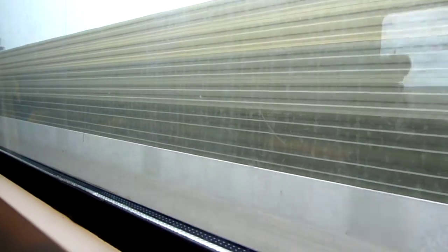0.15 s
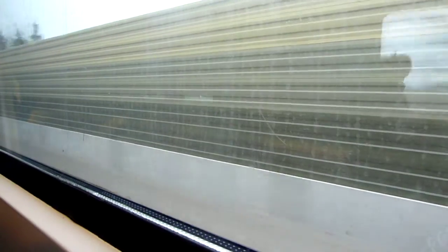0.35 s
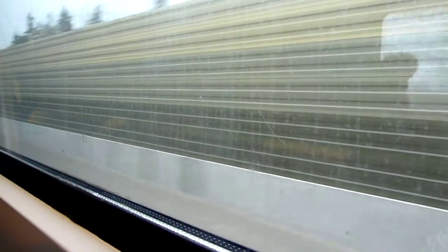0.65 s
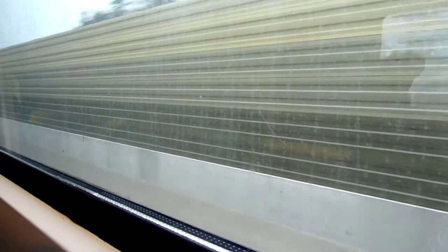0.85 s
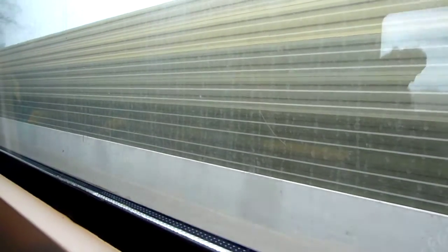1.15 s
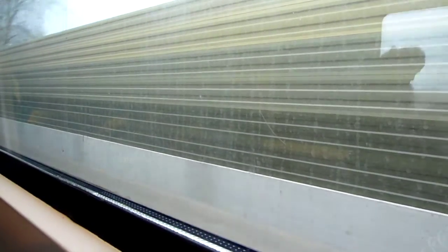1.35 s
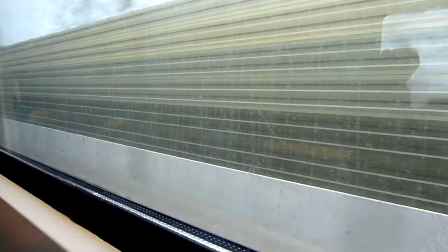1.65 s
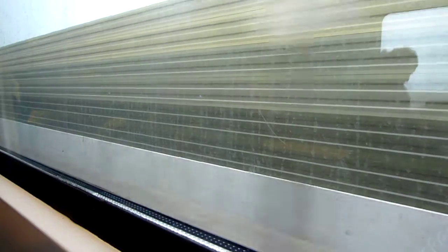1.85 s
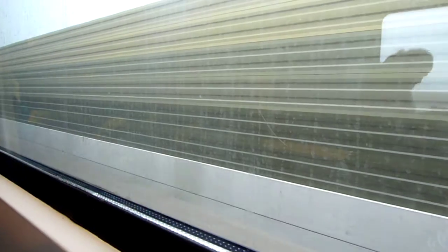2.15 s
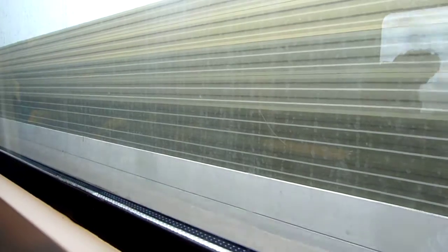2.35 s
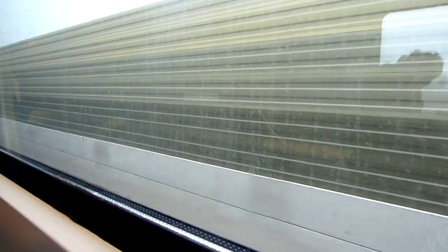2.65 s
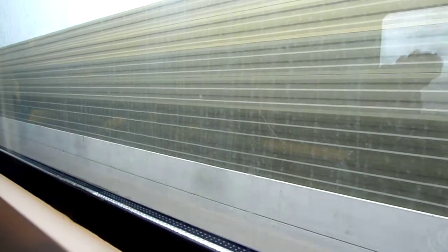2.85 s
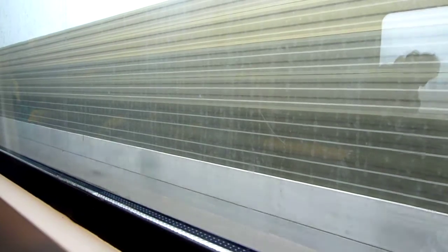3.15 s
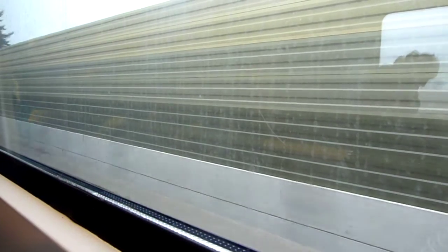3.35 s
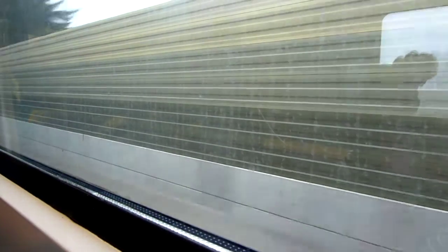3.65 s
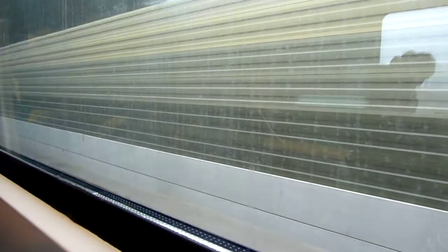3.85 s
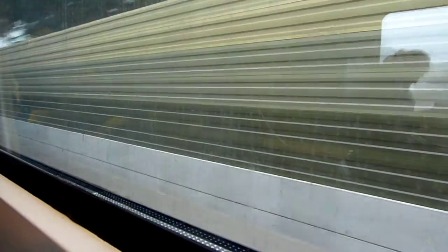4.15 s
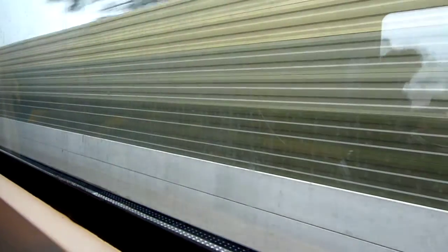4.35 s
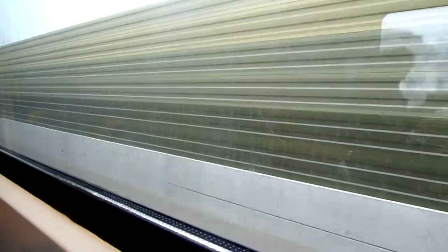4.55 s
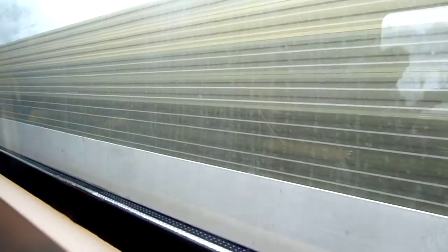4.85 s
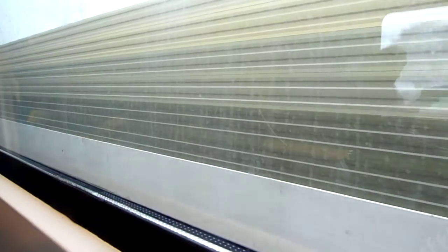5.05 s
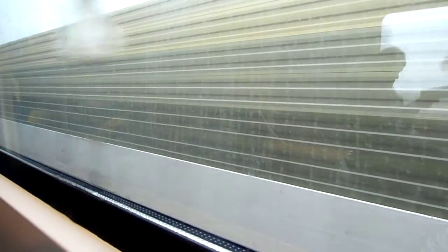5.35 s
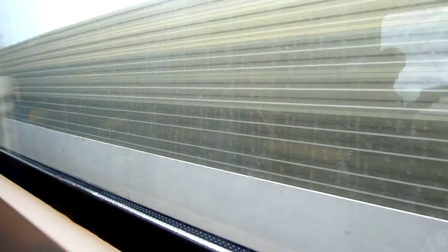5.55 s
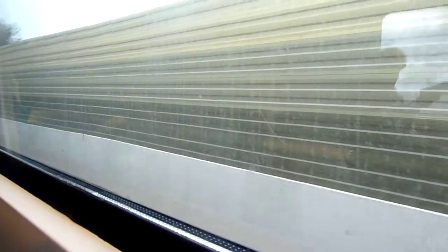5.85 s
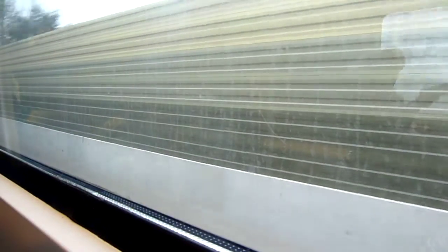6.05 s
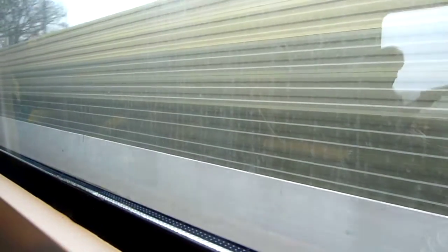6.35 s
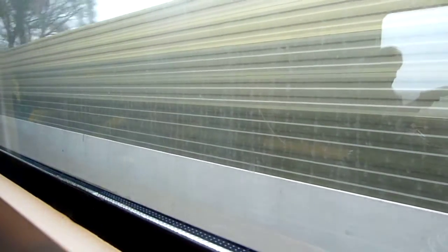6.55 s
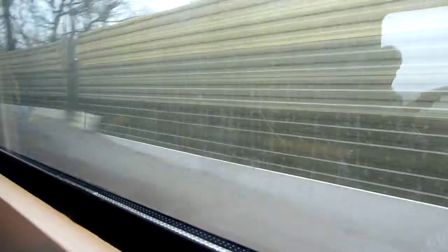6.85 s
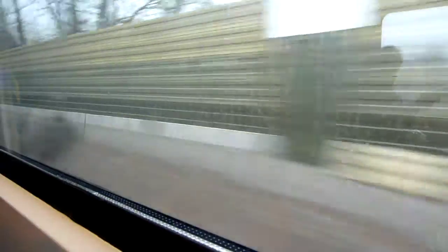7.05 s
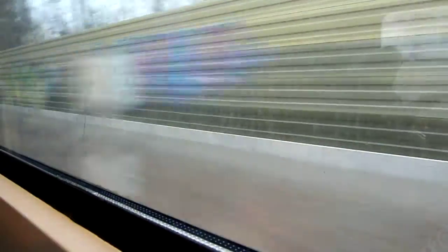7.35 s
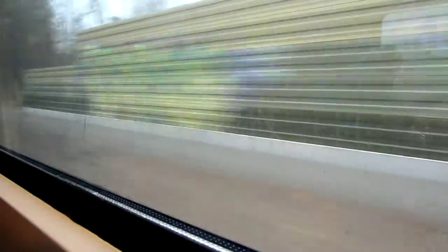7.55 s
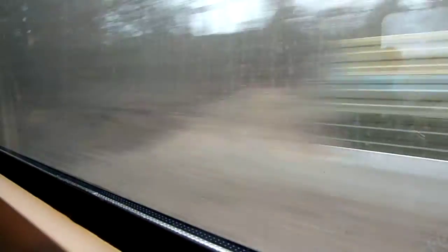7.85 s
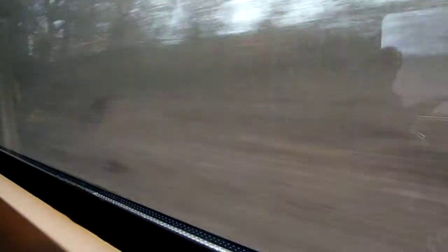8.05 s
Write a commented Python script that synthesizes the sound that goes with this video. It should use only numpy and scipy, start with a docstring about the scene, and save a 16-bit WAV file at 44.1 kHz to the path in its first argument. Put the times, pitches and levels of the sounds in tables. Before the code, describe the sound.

Inside a passenger train at constant high speed, uneven wheels hum low and throb about two and a half times a second over floor rumble and a broad rolling roar. A faint steely ring, soft hiss and rushing air lie above. Loose trim ticks now and then; a tiny metal fitting clinks near two seconds, and hard plastic knocks near seven. Small mono recorder close to the window, treble dull at the top.

```python
"""Inside a passenger train running at speed beside a noise barrier.
Throughout, out-of-round wheels drone in step with their turning, over the noise of floor and shell;
the rolling roar carries a faint ring of steel discs, a hiss and a rush of air, all as filtered noise.
From the start the trim ticks now and then, as chattering contacts that ring resonances. Near 2 s a metal
fitting clinks as the running noise dips; near 7 s a plastic part knocks. Both are sums of dying sines."""
import sys
import numpy as np
from scipy import signal
from scipy.fft import rfft, irfft, next_fast_len
from scipy.io import wavfile

SR = 44100
rng = np.random.default_rng(int(sys.argv[2]) if len(sys.argv) > 2 else 0)


def transcribe(u):
    """Save the signal u as a 16-bit wav file named by the first command-line argument.

    u: samples, shape (n,) or (channels, n), limited to [-1, 1]; the rate is SR.
    q: integer samples, one column per channel.
    """
    v = np.clip(np.atleast_2d(u).T, -1, 1)
    q = np.round(v * 32767).astype(np.int16)
    wavfile.write(sys.argv[1], SR, q)


N = 362061

# the running noise surges evenly as the carriage rides along: surges per s, time of one crest in s
SURGE_PER_S, SURGE_CREST_S = 2.57, 0.23


def from_db(db):
    """Decibels to gain."""
    return 10 ** (np.asarray(db) / 20)


def rms_one(x):
    """Scale to unit power."""
    return x / np.sqrt(np.mean(x ** 2) + 1e-20)


def in_time(rows):
    """Each column of a curve, drawn in straight lines to every sample."""
    s, *columns = np.transpose(rows)
    return [np.interp(np.arange(N) / SR, s, column) for column in columns]


def swing(per_s, crest_s):
    """An even rise and fall between -1 and 1."""
    return np.cos(2 * np.pi * per_s * (np.arange(N) / SR - crest_s))


def drift(rate_hz):
    """Slow random wandering of rms 1: noise through two equal low-pass poles at the given rate."""
    step = 40  # samples between the slow points
    settle = 2000  # slow points thrown away while the filter settles
    r = np.exp(-2 * np.pi * rate_hz * step / SR)
    white = rng.standard_normal(N // step + 2 + settle)
    slow = signal.lfilter([1], [1, -2 * r, r * r], white)[settle:]
    return np.interp(np.arange(N) / step, np.arange(len(slow)), rms_one(slow))


def coloured(spectrum):
    """Noise of rms 1 with the given colour, silent outside its range."""
    hz, db = np.transpose(spectrum)
    size = next_fast_len(N)
    log_hz = np.log(np.maximum(np.fft.rfftfreq(size, 1 / SR), 1))
    gain = from_db(np.interp(log_hz, np.log(hz), db, left=-np.inf, right=-np.inf))
    white = rng.standard_normal(size)
    return rms_one(irfft(rfft(white) * gain, size)[:N])


def resonate(x, hz, width_hz):
    """A two-pole resonance that turns white noise of rms 1 into a ring of rms 1."""
    r = np.exp(-np.pi * width_hz / SR)
    zeros = np.sqrt((1 - r * r) / 2) * np.array([1, 0, -1])
    poles = [1, -2 * r * np.cos(2 * np.pi * hz / SR), r * r]
    return signal.lfilter(zeros, poles, x)


def shaken(modes):
    """Modes kept ringing by random forces, each narrowed around its mode to leave valleys between."""
    out = np.zeros(N)
    for hz, width_hz, db in modes:
        white = rng.standard_normal(N + SR // 2)  # the first half second only builds up the ring
        force = resonate(white, hz, 5 * width_hz)
        out += from_db(db) * rms_one(resonate(force, hz, width_hz)[-N:])
    return out


def wheel_drone():
    """Every wheel turn repeats the same bumps; one multiple booms above the rest and throbs."""
    # train speed: t/s, wheel turns per s
    speed = [(0, 15.66), (1.5, 15.74), (3, 15.8), (5.5, 15.82), (8.2, 15.84)]
    # swell of the booming multiple, before the boom trim: t/s, level/dB
    drone = [(0.0, -32.5), (0.92, -27.5), (3.04, -27), (4.34, -28), (4.52, -29.5), (5.54, -29),
             (6.46, -25.5), (7.34, -29), (8.2, -25)]
    # out-of-round wheels: multiple of the turning rate, level/dB rms
    wheel_orders = [(2, -54.5), (3, -54), (4, -41.5), (6, -42), (7, -37.5), (8, -49), (10, -43), (17, -53),
                    (19, -56.5), (21, -60), (22, -54), (25, -54.5), (29, -61.5)]
    drone_order, boom_db, swell_share = 5, -3.5, 1.2
    throb_db, unsteady_db = 1.5, 1.44
    waver_db, phase_wander_rad = 1.5, 0.4

    turn = 2 * np.pi * np.cumsum(in_time(speed)[0]) / SR
    drone_db = in_time(drone)[0]
    steady_db = np.mean(drone_db)
    swell_db = swell_share * (drone_db - steady_db)
    swell_db += throb_db * swing(per_s=2.49, crest_s=0.18)  # nearly the pace of the surges
    swell_db += unsteady_db * drift(5.0)
    out = from_db(steady_db + swell_db + boom_db) * np.sin(drone_order * turn)
    for order, db in wheel_orders:
        # several wheels of nearly the same size: level and phase wander
        phase = order * turn + rng.uniform(0, 2 * np.pi) + phase_wander_rad * drift(1.9)
        waver = rms_one(from_db(waver_db * drift(1.3)))
        out += from_db(db) * waver * np.sin(phase)
    return np.sqrt(2) * out  # a sine of rms 1 peaks at root two


def carriage_rumble():
    """Track vibration reaches the floor and walls through the bogies, in uneven lumps."""
    # shaking from the track, before the layer trims: t/s, level/dB
    shake = [(0.0, -24), (1.04, -27), (1.26, -23.5), (1.46, -26.5), (3.12, -30), (4.52, -26), (4.74, -26.5),
             (4.92, -26.5), (5.04, -27), (6.5, -27.5), (6.66, -28.5), (6.82, -27), (7.04, -30.5),
             (7.26, -26.5), (8.2, -28.5)]
    # colour of the floor's rumble: f/Hz, relative level/dB per Hz
    rumble = [(8, -18.5), (18, -20), (30, -13.5), (48, -6.5), (68, 1.5), (100, 5), (120, -1), (165, 0),
              (195, -5.5), (260, -25.5)]
    # booming of the carriage shell, before the swells: f/Hz, width/Hz, level/dB rms
    shell_modes = [(89.2, 2.8, -45.5), (137.8, 4, -38.5), (149.2, 5.7, -51), (168, 3.1, -40.5)]
    # colour of the bogies' growl: f/Hz, relative level/dB per Hz
    growl_colour = [(150, -17), (200, 1.5), (250, 2), (290, -1.5), (315, -2.5), (370, -4.5), (440, -7.5),
                    (500, -10.5), (550, -27), (900, -36.5)]
    floor_db, growl_db = -6.5, -9.5
    floor_follows, growl_follows = 0.99, 0.7  # share of the shaking's swell; the shell takes all
    boom_surge_db, growl_surge_db, lumpy_db = -0.1, 0.7, 1.0

    shake_db = in_time(shake)[0]
    steady_db = np.mean(shake_db)
    swell_db = shake_db - steady_db
    surge = swing(SURGE_PER_S, SURGE_CREST_S)
    floor = from_db(steady_db + floor_follows * swell_db + floor_db) * coloured(rumble)
    shell = from_db(swell_db) * shaken(shell_modes)
    boom = (floor + shell) * from_db(boom_surge_db * surge)
    growl_level_db = steady_db + growl_follows * swell_db + growl_surge_db * surge + growl_db
    growl = from_db(growl_level_db) * coloured(growl_colour)
    return (boom + growl) * from_db(lumpy_db * drift(13.0))


def rolling():
    """Rail roughness drives a broad roar, the wheels' own modes and a hiss; air rushes along the window."""
    # rail roughness and passing air, before the layer trims: t/s, roar level/dB, hiss level/dB, air level/dB
    rail = [(0.0, -32.5, -44.2, -49.5), (0.44, -30.9, -43.3, -49.0), (0.66, -34, -45, -51),
            (0.94, -34.5, -45, -55.5), (1.2, -33.1, -44.5, -50), (1.66, -34.5, -46.4, -51.7),
            (1.78, -36.5, -47.1, -55), (2.42, -33.5, -47.5, -51), (3.02, -37.0, -45.5, -56.2),
            (3.38, -34.5, -46.5, -51.6), (3.84, -35.7, -47.0, -53.5), (5.14, -34, -44, -53.5),
            (5.24, -37, -44.5, -55.5), (5.38, -33.0, -44.1, -51.5), (5.82, -35.5, -45, -55.5),
            (6.0, -32, -43.5, -51.5), (6.26, -36.0, -46, -55.5), (8.2, -34.0, -45, -51.5)]
    # colour of the roar: f/Hz, relative level/dB per Hz
    roar_colour = [(250, -22), (520, -2.5), (700, -0.5), (1150, 0), (1450, 2.5), (1850, -1), (2200, 1),
                   (2450, -4), (2900, -6.5), (3600, -35.5), (6000, -46.5)]
    # ringing of wheels and rails, relative to the roar before its lift: f/Hz, width/Hz, level/dB
    wheel_modes = [(1355, 50, -12.5), (1428, 55, -11.5), (1583, 14, -14.5), (2068, 15, -12),
                   (2117, 10, -10), (2284, 16, -18.5), (2535, 10, -22), (2631, 11, -19.5),
                   (2672, 12, -22.5), (2791, 11, -20.5), (2915, 30, -26), (3430, 40, -27), (4574, 12, -33),
                   (4791, 12, -33), (5708, 12, -39), (5833, 12, -39)]
    # colour of the hiss: f/Hz, relative level/dB per Hz
    hiss_colour = [(1800, -14.5), (2800, -0.5), (3450, 3), (3900, -0.5), (4400, -11), (5500, -31)]
    # colour of the rushing air: f/Hz, relative level/dB per Hz
    air_colour = [(3000, -17), (4300, 1.5), (4900, -1), (5500, -2), (6200, -9), (6800, -16), (7400, -26),
                  (7700, -36.5)]
    roar_trim_db, hiss_trim_db, air_trim_db = -4.5, -4.0, -3.5
    broad_lift_db, flutter_db, surge_db = 0.83, 0.63, 0.33

    roar_db, hiss_db, air_db = in_time(rail)
    broad = from_db(broad_lift_db) * coloured(roar_colour)
    roar = from_db(roar_db + roar_trim_db) * (broad + shaken(wheel_modes))
    hiss = from_db(hiss_db + hiss_trim_db) * coloured(hiss_colour)
    air = from_db(air_db + air_trim_db) * coloured(air_colour)
    sway_db = flutter_db * drift(9.8) + surge_db * swing(SURGE_PER_S, SURGE_CREST_S)
    return (roar + hiss + air) * from_db(sway_db)


def dip():
    """A gain that falls quickly and recovers more slowly, once."""
    start_s, fall_s, recover_s, depth_db = 1.968, 0.006, 0.15, 5.5
    since_start = np.arange(N) / SR - start_s
    return from_db(np.interp(since_start, [0, fall_s, fall_s + recover_s], [0, -depth_db, 0]))


def ring_trim(force, modes):
    """The trim's resonances under one force, added with alternating sign."""
    out = np.zeros(len(force))
    for k, (hz, width_hz, db) in enumerate(modes):
        out += (-1) ** k * from_db(db) * resonate(force, hz, width_hz)
    return out


def trim_ticks():
    """A short chatter of contacts rings a loose panel, then dies away in the carriage."""
    # tapping panels: t/s, level/dB before the trim, panel's own f/Hz, knock level/dB beside the tick,
    # chatter t60/s
    ticks = [(0.285, -45, 6200, -9, .08), (0.637, -40, 5150, -7, .07), (0.649, -43.5, 6300, -11, 0.12),
             (0.808, -39.5, 4760, 4.5, 0.12), (0.978, -46, 3570, -4, .2), (1.429, -42.5, 4970, -10, .05),
             (1.936, -42, 5630, -9, 0.041), (1.954, -46, 5150, 3, .05), (4.545, -47, 5100, -9, .05),
             (5.705, -44.5, 5850, -5, 0.089), (6.818, -41, 4330, 9, 0.13), (6.870, -54, 3300, 18.5, .08),
             (7.174, -38.5, 4500, 0, .09), (7.185, -45, 5800, 10, 0.11), (7.502, -42.5, 6000, -10, 0.041)]
    # resonances of the knock: f/Hz, width/Hz, level/dB
    trim_low = [(1250, 150, -5), (1680, 150, 3), (2080, 170, 5.5), (2470, 450, 1.5)]
    # resonances of the tick: f/Hz, width/Hz, level/dB
    trim_high = [(3280, 180, 6), (4210, 160, 1.5), (4860, 180, -0.5), (5360, 470, -3.5), (6620, 270, -13)]
    cabin_t60_s, cabin_db, level_db = 0.38, -10, -5
    contacts_per_s, own_width_hz = 3000, 240
    rise_share = 0.053  # build-up time constant as a share of the chatter's t60

    out, t = np.zeros(N), np.arange(SR // 2) / SR
    for s, db, own_hz, knock_db, t60 in ticks:
        white, wash = rng.standard_normal((2, len(t)))
        contacts = rms_one(np.sign(white) * (rng.random(len(t)) < contacts_per_s / SR))
        chatter = contacts * from_db(-60 * t / t60)
        cabin = wash * from_db(cabin_db - 60 * t / cabin_t60_s)
        # a longer chatter also takes longer to build up
        rise = 1 - np.exp(-t / (rise_share * t60))
        force = rise * (chatter + cabin)
        tick = ring_trim(force, trim_high)
        knock = from_db(knock_db) * ring_trim(force, trim_low)
        # random signs keep the panel's own ring independent of the other resonances
        own = resonate(force * rng.choice([-1, 1], len(t)), own_hz, own_width_hz)
        at = round(s * SR)
        out[at:at + len(t)] += (from_db(db + level_db) * (tick + own + knock))[:N - at]
    return out


def struck(touches, modes, spread_db):
    """Each touch strikes every mode with a strength of its own; the modes ring and die away."""
    contact_s = 0.0004  # how long a touch takes to set the modes ringing
    out, t = np.zeros(N), np.arange(SR // 2) / SR
    hz, mode_db, t60 = np.transpose(modes)[:, :, None]
    rings = (1 - np.exp(-t / contact_s)) * from_db(-60 * t / t60) * np.sin(2 * np.pi * hz * t)
    for s, db in touches:
        strength = from_db(db + mode_db + spread_db * rng.standard_normal(hz.shape))
        strength = strength * rng.choice([-1, 1], hz.shape)
        at = round(s * SR)
        out[at:at + len(t)] += np.sum(strength * rings, axis=0)[:N - at]
    return out


def plastic_knocks():
    """A hard plastic part knocks and bounces, its many short modes struck at each touch."""
    # touches: t/s, strength/dB before the mode levels
    knocks = [(6.8142, -28.5), (6.8175, -28), (6.824, -36), (6.836, -41), (6.849, -42), (6.876, -40)]
    # modes: f/Hz, level/dB, t60/s
    knock_modes = [(1266, -6, 0.076), (1650, -7, .045), (1896, -2, .04), (2190, -7, .045),
                   (2460, -1.5, 0.046), (2900, -3, .032), (3190, -8, .03), (3970, -18, .03),
                   (4500, -18, .02), (5260, -9, 0.036), (5480, -12, 0.033), (6100, -20, .026),
                   (6650, -21, 0.048)]
    return struck(knocks, knock_modes, spread_db=2.0)


def metal_clinks():
    """A small metal fitting clinks, its few high modes struck at each touch."""
    # touches: t/s, strength/dB before the mode levels
    clinks = [(1.941, -47), (1.949, -49), (1.958, -48), (1.967, -52), (1.991, -53), (2.023, -59),
              (2.066, -55)]
    # modes: f/Hz, level/dB, t60/s
    clink_modes = [(5150, -8, .04), (5640, -7, .05), (6040, -2, .08), (6729, -5, .06), (6830, -10, .04)]
    return struck(clinks, clink_modes, spread_db=5.0)


def scene():
    """Running noise, with one brief dip under a steady drone, and the small sounds of the interior."""
    running = (carriage_rumble() + rolling()) * dip() + wheel_drone()
    interior = trim_ticks() + plastic_knocks() + metal_clinks()
    return (running + interior)[None]


def record(dry):
    """A small mono recorder: the treble rolls off, then stops."""
    roll_off = signal.butter(10, 7400, fs=SR, output="sos")
    stop = signal.ellip(10, 0.1, 80, 7450, fs=SR, output="sos")  # ripple dB, stopband dB, edge Hz
    return signal.sosfilt(stop, signal.sosfilt(roll_off, dry))


dry = scene()
out = record(dry)
transcribe(out)
```